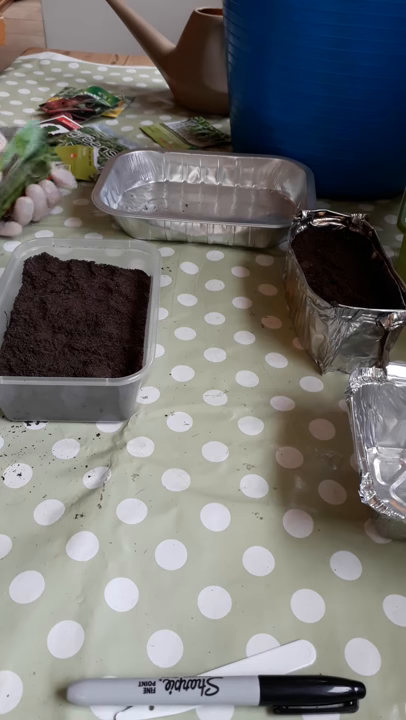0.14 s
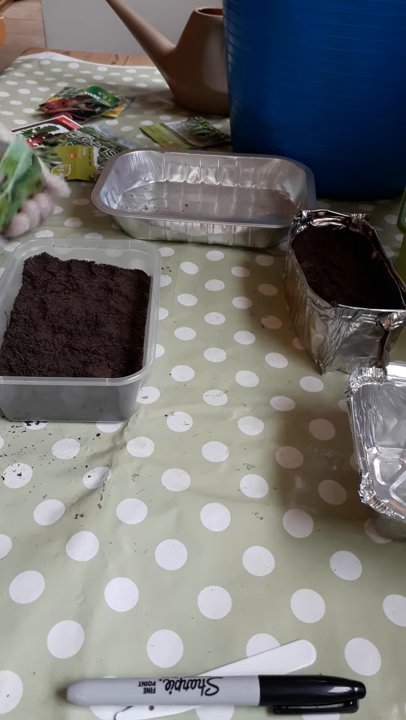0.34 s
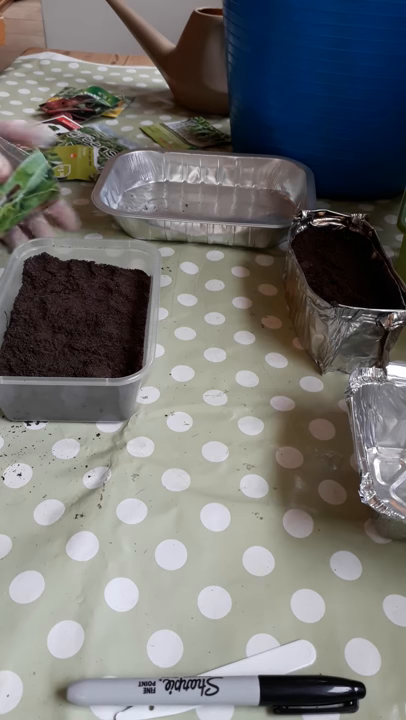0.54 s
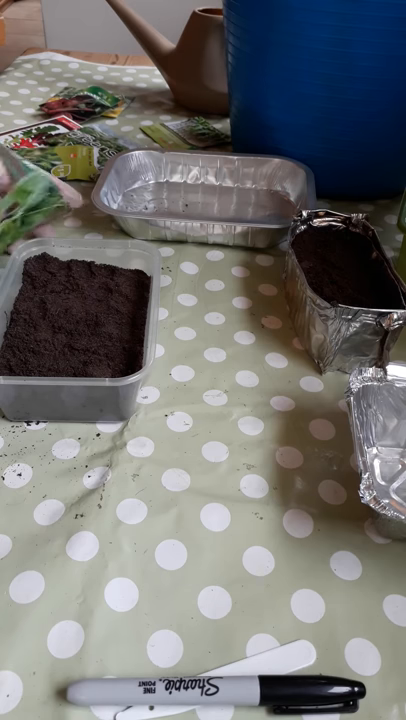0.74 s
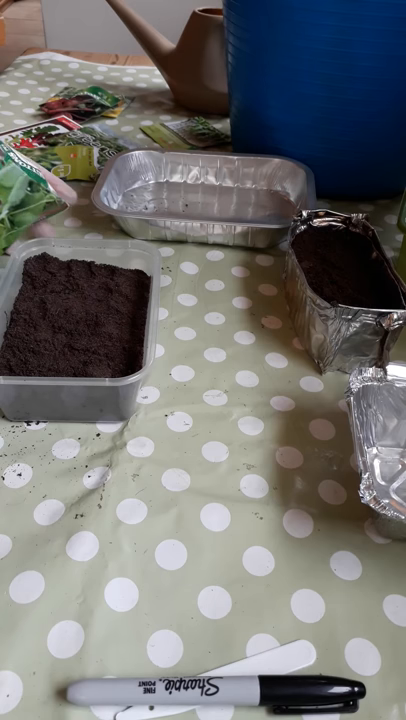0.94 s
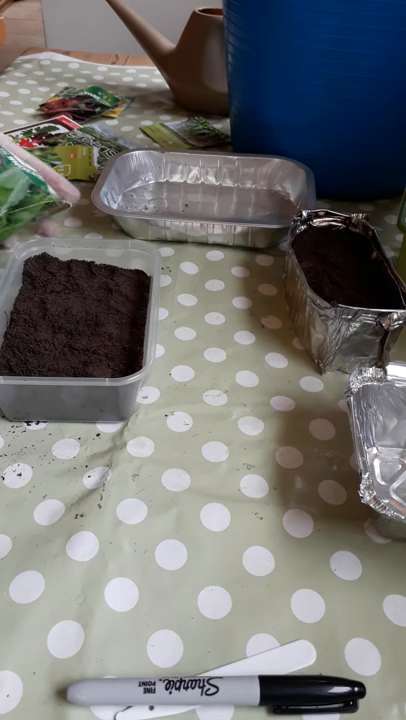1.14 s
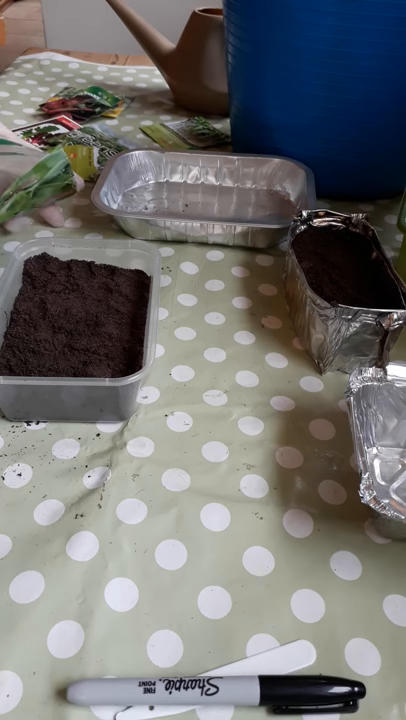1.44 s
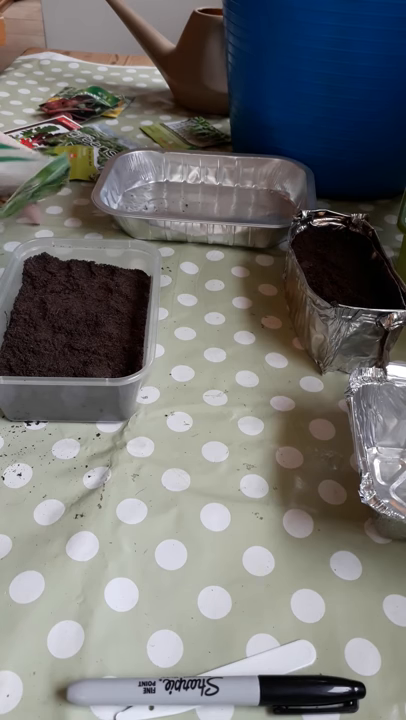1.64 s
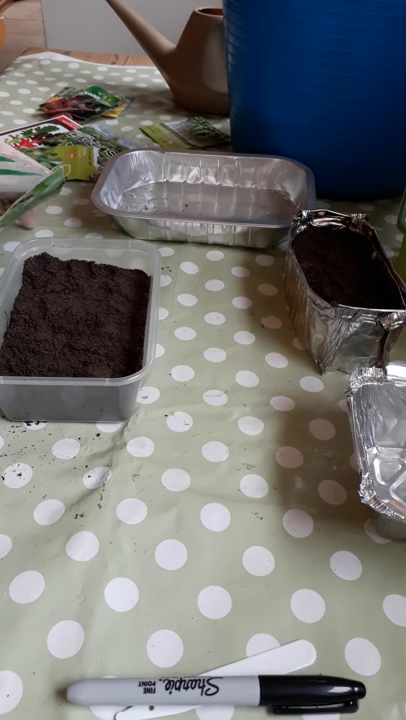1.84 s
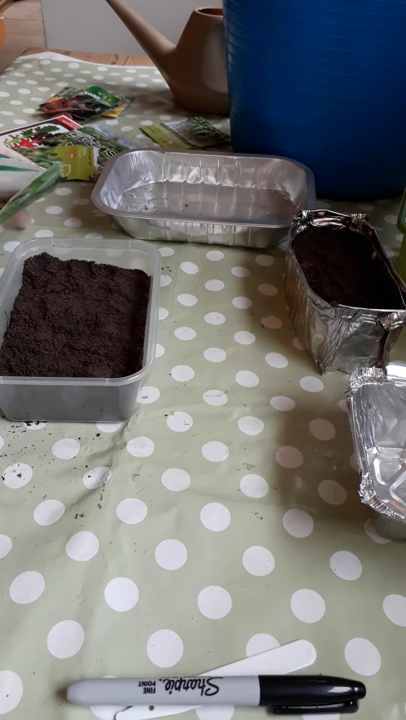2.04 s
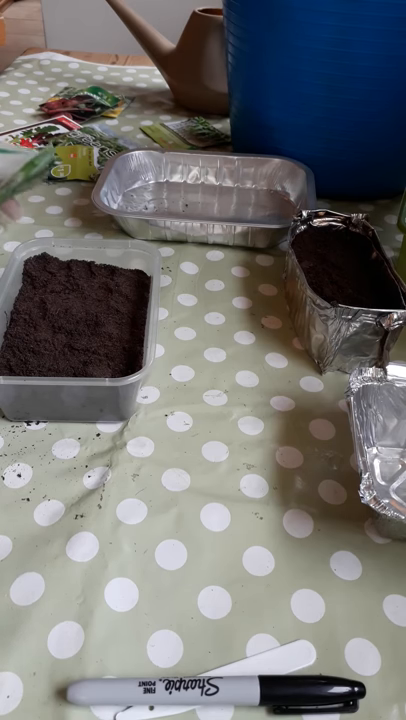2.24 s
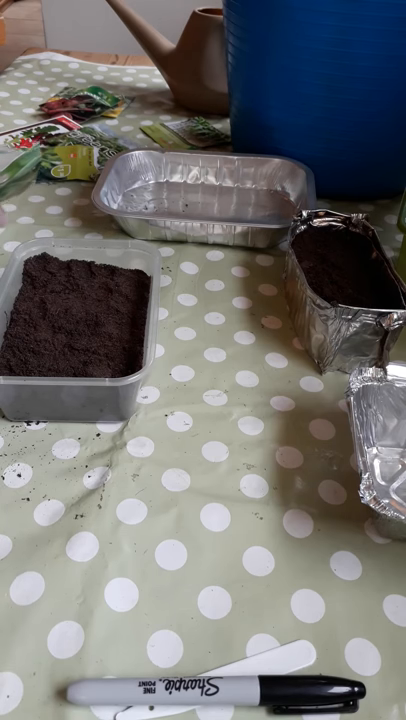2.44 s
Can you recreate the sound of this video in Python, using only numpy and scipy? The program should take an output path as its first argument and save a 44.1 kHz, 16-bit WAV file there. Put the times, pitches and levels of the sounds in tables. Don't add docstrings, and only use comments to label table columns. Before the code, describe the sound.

Crinkling paper packet handled close by, one hard low slap early and a crisp squeeze near the end

```python
import sys
import numpy as np
from scipy import signal
from scipy.fft import rfft, irfft, next_fast_len
from scipy.io import wavfile
from scipy.ndimage import uniform_filter1d

SR = 44100
rng = np.random.default_rng(int(sys.argv[2]) if len(sys.argv) > 2 else 0)


def master_out(mix):
    frames = np.transpose(np.atleast_2d(mix))
    ceiling = np.clip(frames, -1, 1)
    pcm = np.round(ceiling * 32767).astype(np.int16)
    wavfile.write(sys.argv[1], SR, pcm)


def makeup_ratio(level_db):
    decades = np.asarray(level_db, float) / 20
    return 10 ** decades


N = 114660
MOVE_S = 1.52
POP_RISE_S = 0.0024

# f/Hz, coherence [0-1]
LIKENESS = [(60, 1), (400, 0.69), (900, 0.7), (1600, 0), (12000, 0.05)]


def evened(x):
    return x / np.sqrt(np.mean(x ** 2) + 1e-20)


def read(points, hz):
    f, value = np.transpose(points)
    return np.interp(np.log(hz + 1), np.log(f + 1), value)


def bump(hz, centre_hz, width_hz):
    return 1 / (1 + (2 * (hz - centre_hz) / width_hz) ** 2)


def add(sides, s, sound):
    part = sides[int(s > MOVE_S)][round(s * SR):][:len(sound)]
    part += sound[:len(part)]


def ring(db, hz, t60, rise_s=POP_RISE_S):
    t = np.arange(12000) / SR
    decay = makeup_ratio(db - 60 * t / max(t60, .003))
    return decay * (1 - np.exp(-t / rise_s)) * np.sin(2 * np.pi * hz * t)


def colour(hz, bright, extra_db):
    # f/Hz, level/dB per Hz
    flexing = [(35, -63), (60, -23.5), (197, -2.5), (425, -5.5), (500, 1), (1160, -3), (1600, -6.5),
               (3000, -8.5), (15700, -25.5)]
    # f/Hz, level/dB per Hz
    sliding = [(35, -53.5), (60, -27.5), (306, -25), (725, -11.5), (959, -15.5), (1240, -8.5), (2490, -4.5),
               (7810, -3.5), (15700, -7.5)]
    share = 1.632 * bright - .2
    db = read(flexing, hz)[:, None] * (1 - share) + read(sliding, hz)[:, None] * share + extra_db
    return makeup_ratio(db) / np.sqrt(np.mean(makeup_ratio(db) ** 2, axis=0))


def pair(shape, hz):
    a, b, c, d = rng.standard_normal((4,) + shape)
    same = np.clip(read(LIKENESS, hz), 0, 1)[:, None]
    first, other = a + 1j * b, c + 1j * d
    return np.array([first, same * first + np.sqrt(1 - same ** 2) * other])


def hiss():
    # f/Hz, level/dB per Hz
    air_spectrum = [(15, -40.5), (25, -16), (113, 3), (307, -8.5), (1350, -11), (2380, -14.5), (4670, -11),
                    (7580, -7.5), (15700, -19.5)]
    hz = np.fft.rfftfreq(2048, 1 / SR)
    z = pair((1025, N // 512 + 5), hz * 5) * makeup_ratio(read(air_spectrum, hz))[:, None]
    air = signal.istft(z, SR, nperseg=2048, noverlap=1536)[1][:, :N]
    return makeup_ratio(-70.5) * evened(air)


def slip_drive():
    slips_per_s, slip_spread_db, smooth, clump_db = 3900, 1.5, 0.33, 1.1
    chance, size = rng.random(N), rng.exponential(1, N)
    sign, clump = np.sign(rng.standard_normal(N)), rng.standard_normal(N)
    slips = sign * makeup_ratio(slip_spread_db * np.minimum(size, 5)) * (chance < slips_per_s / SR)
    drive = (1 - smooth) * evened(slips) + smooth * rng.standard_normal(N)
    return evened(drive * makeup_ratio(clump_db * evened(uniform_filter1d(clump, size=250))))


def slides():
    # t/s, effort level/dB, brightness [0-1]
    left_strokes = [
        [(0,-52.5,0.35),(.136,-57.5,0.47),(.21,-50.5,0.4),(.248,-59.5,0.25),(.32,-48,0.25),(.336,-38,0.45)],
        [(.48,-47.5,0.38),(.62,-62,0.41),(.634,-45,0.44),(.648,-43.5,0.24),(.663,-37,0.37),(.678,-44.5,0),(.72,-62.5,0.1),(.8,-65.5,0.28),(1,-64.5,0.19)],
        [(1.08,-53,0.27),(1.17,-57,0.48),(1.182,-53.5,0.21),(1.25,-52,0.48),(1.33,-53,0.14),(1.4,-64,0.44),(1.47,-71.5,1),(1.51,-78,1)],
    ]
    # t/s, effort level/dB, brightness [0-1]
    right_strokes = [
        [(1.525,-72.5,1),(1.6,-63,1),(1.675,-62.5,1),(1.72,-77.5,0.5),(1.8,-78,0.58),(1.88,-64.5,0.9),(1.99,-75.5,0.44)],
        [(2.01,-94,0.68),(2.038,-49,0.7),(2.056,-46.5,0.45),(2.07,-58.5,0.46),(2.11,-54.5,0.57),(2.15,-62,1)],
        [(2.16,-50,0.24),(2.22,-53,0.46),(2.255,-43,0.83),(2.285,-30,0.82),(2.312,-33.5,0.82),(2.324,-45.5,0.77),(2.45,-45.5,0.63),(2.53,-49.5,0.67),(2.57,-70,1)],
    ]
    # t/s, f/Hz, strength level/dB
    hollow = [(.6, 2780, -5), (.655, 2670, 5), (.74, 2000, 18), (.8, 2000, -1), (1.33, 1310, -3),
              (1.36, 1340, 12), (1.42, 1400, 6), (1.446, 3130, 6), (1.5, 3220, 4), (1.559, 3395, -2.5),
              (1.74, 3420, -8), (1.801, 2216, 13.5), (1.971, 2880, 2.5), (2.045, 2350, -3.5),
              (2.1, 1215, 11), (2.25, 1260, 11), (2.4, 1145, 13), (2.55, 930, 7.5)]
    hollow_q, patch_db = 4.2, 1.75
    hz, t, z = signal.stft(slip_drive(), SR, nperseg=512)
    patches = uniform_filter1d(rng.standard_normal(z.shape), size=7, axis=0)
    patches = uniform_filter1d(patches, size=5, axis=1)
    fold_s, fold_hz, fold_db = np.transpose(hollow)
    fold_hz = np.interp(t, fold_s, fold_hz)
    hollow_db = np.interp(t, fold_s, fold_db) * bump(hz[:, None], fold_hz, fold_hz / hollow_q)
    rows = np.vstack(left_strokes + right_strokes)
    bright = np.interp(t, rows[:, 0], rows[:, 2])
    z = z * colour(hz, bright, hollow_db) * makeup_ratio(patch_db * evened(patches))
    now, gain = np.arange(N) / SR, np.zeros(N)
    for stroke in left_strokes + right_strokes:
        s, db, _ = np.transpose(stroke)
        gain += makeup_ratio(np.interp(now, s, db, left=-200, right=-200))
    sound = uniform_filter1d(gain, size=60) * signal.istft(z, SR, nperseg=512)[1][:N]
    return np.array([sound * (now < MOVE_S), sound * (now >= MOVE_S)])


def knocks():
    # t/s, level/dB
    knock_events = [(0.047, -66), (0.146, -53), (0.336, -23.5), (0.642, -47), (0.957, -51.5), (1.02, -70),
                    (1.196, -53.5), (1.331, -50), (2.037, -54.5), (2.155, -51.5), (2.301, -47)]
    # f/Hz, level/dB, t60/s
    table_modes = [(91, -11.5, 0.29), (134, -7.5, 0.16), (164.7, -2.5, 0.22), (300, -9.5, 0.083)]
    sides = np.zeros((2, N))
    for s, db in knock_events:
        add(sides, s, -sum(ring(db + mode_db - 8.5, hz, t60) for hz, mode_db, t60 in table_modes))
    return sides


def pops():
    # t/s, level/dB, f/Hz, t60/s
    pop_events = [
        (0.157, -28.5, 711, 0.037),
        (0.201, -39.5, 550, 0.036),
        (0.217, -33, 640, 0.027),
        (0.223, -35.5, 560, 0.025),
        (0.279, -35, 683, 0.03),
        (0.831, -46, 694, 0.03),
        (0.84, -39.5, 601, 0.05),
        (1.0222, -22, 890, 0.024),
    ]
    sides = np.zeros((2, N))
    for s, *mode in pop_events:
        add(sides, s, ring(*mode))
    return sides


def flicks():
    # t/s, level/dB, f/Hz, t60/s
    flick_events = [(.209, -34, 970, 0.014), (.2195, -28, 1180, 0.0092), (.226, -37.5, 2130, .02),
                    (.296, -34, 1150, 0.016), (.299, -38, 2040, 0.011), (.3385, -23.5, 6950, 0.011),
                    (.358, -19, 1370, .012), (.579, -39, 7150, .02), (.631, -41, 1090, 0.016),
                    (.633, -41, 3020, 0.014), (.636, -36.5, 7260, 0.014), (.653, -35, 2950, .015),
                    (.656, -40, 6960, .015), (.663, -32.5, 1208, 0.023), (.672, -32, 1200, 0.027),
                    (.674, -34, 3070, .015), (.694, -35.5, 1320, 0.017), (.845, -38.5, 1100, 0.01),
                    (1.023, -15.5, 9940, .01), (1.0258, -21, 1190, 0.0082), (1.256, -40, 1060, 0.018),
                    (1.3115, -44, 960, 0.023), (1.312, -37.5, 2020, 0.012), (1.3545, -29, 1185, 0.014),
                    (1.3565, -29.5, 2110, 0.0093), (1.376, -36, 1440, 0.021), (1.446, -48, 3020, 0.032),
                    (1.466, -54.5, 3125, 0.025), (1.93, -61, 644, 0.012), (1.936, -64.5, 300, 0.023),
                    (2.281, -27.5, 1550, 0.011), (2.281, -24.5, 7840, 0.018), (2.294, -23, 7770, 0.01),
                    (2.298, -31.5, 1170, 0.016), (2.299, -20.5, 7890, .012), (2.308, -27.5, 1170, 0.01),
                    (2.309, -30, 3880, 0.01), (2.522, -51, 6640, 0.016)]
    sides = np.zeros((2, N))
    for s, *mode in flick_events:
        add(sides, s, ring(*mode, rise_s=0.00035))
    return sides


def snap(db, ring_hz, bright, t60):
    spikes_db, crack_db, ring_db, ring_q = 6.5, 11, 4, 2.5
    t, hz = np.arange(4096) / SR, np.fft.rfftfreq(4096, 1 / SR)
    noise, unevenness = rng.standard_normal((2, 4096))
    shape = colour(hz, bright, ring_db * bump(hz, ring_hz, ring_hz / ring_q)[:, None])[:, 0]
    fold = irfft(np.log(shape + 1e-5)) * np.r_[1, 2 * np.ones(2047), 1, np.zeros(2047)]
    spikes = makeup_ratio(spikes_db * evened(uniform_filter1d(unevenness, size=30)))
    drive = noise * spikes * makeup_ratio(-60 * t / max(t60, .003)) * np.minimum(t / 0.00055, 1)
    drive = drive + makeup_ratio(crack_db) * (t == 0)
    z = rfft(drive)
    even = np.sqrt(np.sum(drive ** 2) / uniform_filter1d(abs(z) ** 2, size=35)) / makeup_ratio(spikes_db / 2)
    low_loss = hz / (hz + 120j)
    return makeup_ratio(db - 8) * irfft(z * even * np.exp(rfft(fold)) * low_loss)[:3000]


def snaps():
    # t/s, level/dB, ring f/Hz, brightness [0-1], burst t60/s
    snap_events = [(0.226,-20,2240,0.06,0.01),(0.292,-27.5,3360,0.2,0.028),(0.3364,-10.5,4060,0.22,0.027),(.339,-5,1420,0.17,0.0091),
                   (0.356,-27,1420,0.6,0.0057),(0.576,-34,7200,1,0.026),(0.661,-33,1220,0.1,0.011),(0.673,-41,1310,0.5,0.012),
                   (.842,-34.5,1250,0.08,0.0096), (1.0213,-19.5,10100,0.43,0.014),
                   (1.1767,-22.5,12000,0.86,0.013),
                   (1.257,-31.5,1025,0.15,0.014),(1.31,-31,2005,0.19,0.018),(1.354,-26.5,1770,0.25,0.012),(1.447,-45,3166,1,0.02),
                   (2.156,-31.5,3070,0.55,0.051),(2.279,-25,1490,0.72,0.023),(2.292,-24.5,7460,0.9,0.032),(2.298,-24,1250,0.4,0.046),(2.308,-31.5,1190,0.39,0.043)]
    sides = np.zeros((2, N))
    for s, *crease in snap_events:
        add(sides, s + .0015, snap(*crease))
    return sides


def thuds():
    # t/s, level/dB, f/Hz, t60/s
    thud_events = [
        (.336, -10.5, 241.6, 0.019),
        (1.023, -30.5, 300, 0.016),
        (1.024, -28, 541, 0.031),
    ]
    sides = np.zeros((2, N))
    for s, *mode in thud_events:
        add(sides, s, -ring(*mode))
    return sides


def ports(x, lag_s, lean):
    lag_wander, scatter_db = .3, -8
    hz, t, z = signal.stft(x, SR, nperseg=256)
    drift = evened(uniform_filter1d(rng.standard_normal(len(t)), size=12))
    phase = np.pi * np.outer(hz, lag_s * (1 + lag_wander * drift))
    half = makeup_ratio(read(lean, hz) / 2)[:, None] * np.exp(-1j * phase)
    direct = signal.istft(np.array([z * half, z / half]), SR, nperseg=256)[1][:, :N]
    size = next_fast_len(N + 4096)
    scatter = rng.standard_normal((2, 400)) * makeup_ratio(-60 * np.arange(400) / SR / 0.0013)
    unlike = 1 - read(LIKENESS, np.fft.rfftfreq(size, 1 / SR))
    scatter = rfft(scatter / np.linalg.norm(scatter[0]), size) * makeup_ratio(scatter_db) * unlike
    return direct + irfft(rfft(x, size) * scatter, size)[:, :N]


def room(x):
    # f/Hz, t60/s
    decay_times = [(100, 0.098), (260, 0.3), (700, 0.33), (1840, 0.44), (4850, 0.34), (12800, 0.33)]
    gap_s, early_db = 0.0017, -17
    hz, t = np.fft.rfftfreq(512, 1 / SR), np.arange(200) * 128 / SR
    z = pair((257, 200), hz) * makeup_ratio(-60 * t / read(decay_times, hz)[:, None])
    tail = signal.istft(z, SR, nperseg=512, noverlap=384)[1]
    z = signal.stft(tail, SR, nperseg=1024)[2]
    power = np.sum(abs(z) ** 2, axis=2, keepdims=True)
    z = z * np.sqrt(uniform_filter1d(power, size=9, axis=1) / power)
    tail = signal.istft(z, SR, nperseg=1024)[1]
    tail = tail * np.clip(np.arange(tail.shape[1]) / SR / gap_s, 0, 1) ** 2
    tail = tail / np.linalg.norm(tail[0])
    at = (rng.uniform(0.0022, .03, 8) * SR).astype(int) + rng.integers(0, 6, (2, 8))
    for side in range(2):
        tail[side, at[side]] += makeup_ratio(early_db - 300 * at[side] / SR) * (-1) ** np.arange(8)
    return signal.fftconvolve(x[None], tail, axes=1)[:, :N]


def port_tint(x):
    # f/Hz, width/Hz, left level/dB, right level/dB
    port_modes = [
        (7340, 1830, 1, 6),
        (2730, 5900, 3.5, 2.5),
        (4650, 970, 2.5, 1),
    ]
    hz = np.fft.rfftfreq(N, 1 / SR)
    tint_db = sum(np.outer(side_db, bump(hz, f, w)) for f, w, *side_db in port_modes)
    low_cut = signal.butter(4, 75, "high", fs=SR, output="sos")
    return signal.sosfilt(low_cut, irfft(rfft(x) * makeup_ratio(tint_db), N))


def scene():
    # f/Hz, left minus right level/dB
    lean_left = [(60, 0.41), (180, 1.5), (550, 0.41), (1650, 1.1), (4970, 2.8), (15000, 2.1)]
    # f/Hz, left minus right level/dB
    lean_right = [(60, -8), (180, -0.067), (550, 0.7), (1650, 2.5), (4970, -0.5), (15000, -2.5)]
    lag_left_s, lag_right_s = -.0001, .000125
    wet_left_db, wet_pops_db, wet_right_db = -2, -9.5, -10.5
    packet = slides() + knocks() + snaps() + thuds()
    popping = pops() + flicks()
    left = ports(packet[0] + popping[0], lag_left_s, lean_left)
    left = left + room(makeup_ratio(wet_left_db) * packet[0] + makeup_ratio(wet_pops_db) * popping[0])
    near = packet[1] + popping[1]
    right = ports(near, lag_right_s, lean_right) + makeup_ratio(wet_right_db) * room(near)
    return port_tint(left + right) + hiss()


def top_cut(x):
    return signal.sosfilt(signal.butter(12, 16840, fs=SR, output="sos"), x)


def record(dry):
    edge = signal.firwin(801, 15900, window=("kaiser", 5), fs=SR)
    mix = signal.oaconvolve(dry, edge[None], "same")
    return top_cut(mix)


dry = scene()
out = record(dry)
master_out(out)
```